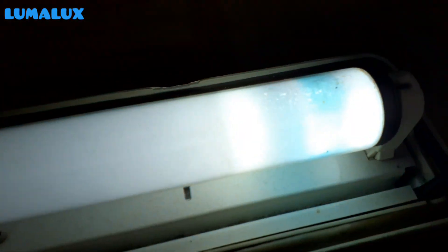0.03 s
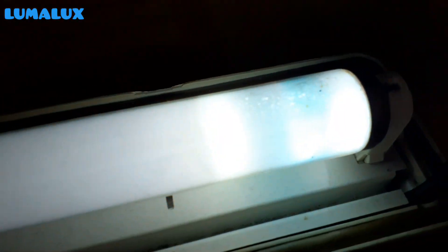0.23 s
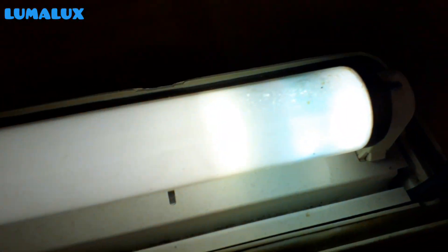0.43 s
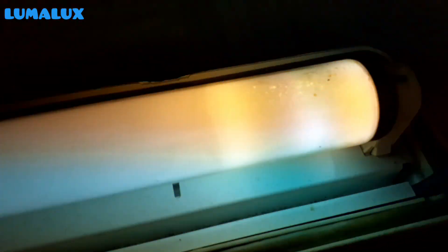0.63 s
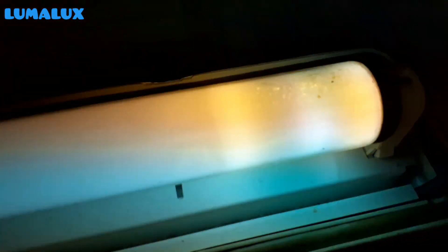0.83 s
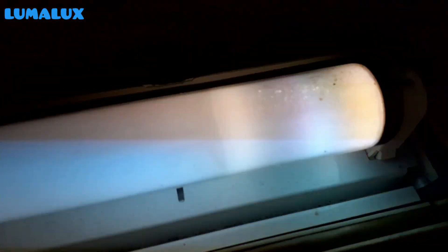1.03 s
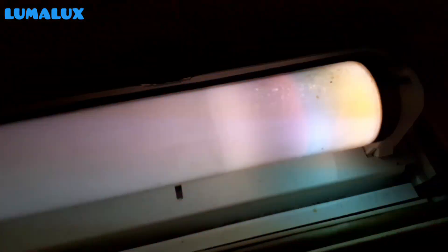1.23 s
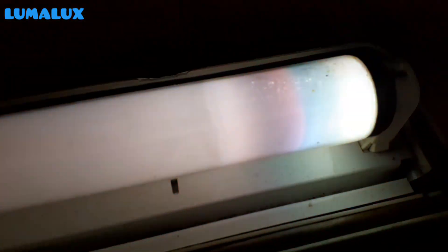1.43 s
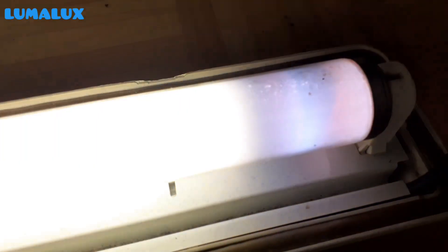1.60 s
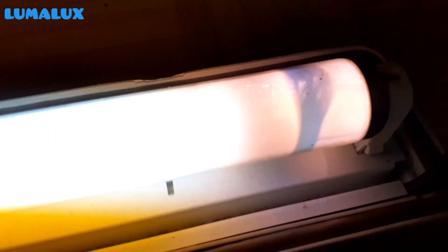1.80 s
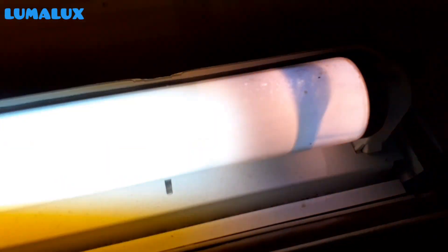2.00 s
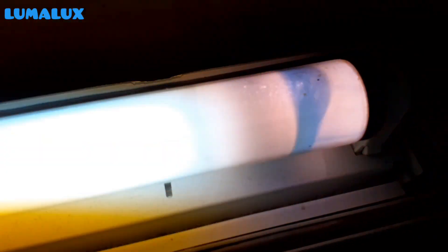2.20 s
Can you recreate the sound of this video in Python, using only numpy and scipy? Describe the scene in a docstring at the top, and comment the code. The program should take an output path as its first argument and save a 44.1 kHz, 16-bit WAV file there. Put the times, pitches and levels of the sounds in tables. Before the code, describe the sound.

A failing fluorescent tube hums and buzzes close by in a small room. Its metal fitting clunks and the starter rattles with rapid glassy ticks. The rattle stops abruptly, leaving a faint buzz, soft hiss and a few tiny ticks.

```python
"""A failing fluorescent tube tries to start, close up in a small room. Its ballast hums and the housing
buzzes on the mains. A surge of current clunks the metal fitting; for half a second the starter
rattles, a glassy tick on about every mains cycle. Then the tube catches: the rattle stops, the hum
drops to a faint buzz over room hiss, and a few faint ticks follow."""
import sys
import numpy as np
from scipy import signal
from scipy.fft import rfft, irfft
from scipy.io import wavfile
from scipy.ndimage import uniform_filter1d

SR = 44100
rng = np.random.default_rng(int(sys.argv[2]) if len(sys.argv) > 2 else 0)


def materialize(psi):
    """Save the field psi as 16-bit PCM at rate SR to the path in sys.argv[1].

    A 1-D psi becomes a single channel; in a 2-D psi each row is a channel.
    """
    bounded = np.clip(np.atleast_2d(psi).T, -1, 1)
    quanta = np.round(bounded * 32767).astype(np.int16)
    wavfile.write(sys.argv[1], SR, quanta)


N = 103635

MAINS_HZ = 50.05
TICK_ALIKE = 0.69  # share of a tick's power that repeats from tick to tick
# The starter's ticks. Each row: start in seconds, glassy ring in relative dB, crack in relative dB.
TICKS = [(1.0107, -42.5, -47.5), (1.0501, -34.5, -47), (1.0697, -37.5, -49), (1.0888, -34.5, -47),
         (1.1072, -39.5, -51.5), (1.1293, -43, -49.5), (1.149, -43.5, -47.5), (1.1688, -51, -53),
         (1.1886, -40.5, -53), (1.2061, -45, -55), (1.2272, -40.5, -54.5), (1.2466, -38, -55.5),
         (1.2674, -43.5, -56.5), (1.2869, -38, -56.5), (1.3076, -40, -56.5), (1.3268, -35.5, -59),
         (1.3365, -38, -56.5), (1.3475, -35.5, -56), (1.366, -39.5, -57.5), (1.3751, -36, -57),
         (1.3879, -37.5, -53.5), (1.408, -36, -61.5), (1.4266, -40, -56), (1.4477, -35.5, -55),
         (1.4668, -44, -59.5), (1.4776, -43, -61.5), (1.4883, -41, -62.5), (1.496, -40, -62),
         (1.5061, -39, -57.5), (1.762, -64.5, -86), (1.802, -62, -80), (1.822, -64, -75.5),
         (2.26, -73, -92), (2.301, -72, -93), (2.34, -71, -87)]


def undb(db):
    """Decibels to gain."""
    return 10 ** (np.asarray(db) / 20)


def unit(x):
    """Scale to rms 1."""
    return x / np.sqrt(np.mean(x ** 2))


def pan(db):
    """Stereo gains with mean 1, the left louder by db."""
    gains = undb(np.array([[db], [-db]]) / 2)
    return gains / gains.mean()


def curve(t, points):
    """Straight lines through (seconds, value) points."""
    return np.interp(t, *np.array(points).T)


def walk(rate):
    """Random drift at rms 1, with rate turns a second."""
    step = int(SR / rate)
    held = np.repeat(rng.standard_normal(N // step + 2), step)
    return unit(uniform_filter1d(held, step)[:N])


def fade(t, t60):
    """Exponential decay, 60 dB down after t60 seconds."""
    return np.exp(-np.log(1000) * t / t60)


def colour(points):
    """An EQ curve through (Hz, dB) points."""
    hz, db = np.array(points).T
    return lambda f: undb(np.interp(np.log(f), np.log(hz), db))


def resonances(rows):
    """An EQ curve of resonant peaks. Each row: centre in Hz, width in Hz, level in dB."""
    return lambda f: np.sqrt(sum(undb(db) ** 2 / (1 + ((f / hz - hz / f) * hz / width) ** 2 / 2) ** 2
                                 for hz, width, db in rows))


def noise(shape):
    """Stereo noise through an EQ curve at rms 1, wider in the treble than in the bass."""
    bass_alike, treble_alike, crossover_hz = 0.3, 0.083, 694
    f = np.fft.rfftfreq(N, 1 / SR) + 1
    alike = treble_alike + (bass_alike - treble_alike) / (1 + (f / crossover_hz) ** 4)
    mid, side = rfft(rng.standard_normal((2, N))) * shape(f)
    return unit(irfft(mid * np.sqrt(1 + alike) + np.array([[1], [-1]]) * side * np.sqrt(1 - alike), N))


def strikes(rows, shape, t60, alike):
    """Each (seconds, dB) blow rings a dense body, partly the same way each time; the room adds a tail."""
    attack_s = 0.00046
    t = np.arange(N // 8) / SR
    room_tail = undb(-18) * fade(t, t60=.16)
    envelope = (1 - np.exp(-t / attack_s)) * np.hypot(fade(t, t60), room_tail)
    body, fresh = noise(shape), noise(shape)
    out = np.zeros((2, N + len(t)))
    for (start_s, db), pick in zip(rows, rng.integers(0, N - len(t), len(rows))):
        i = int(start_s * SR)
        grain = np.sqrt(alike) * body[:, :len(t)] + np.sqrt(1 - alike) * fresh[:, pick:pick + len(t)]
        out[:, i:i + len(t)] += undb(db) * envelope * grain
    return out[:, :N]


def ringing(rows, modes, t60):
    """Blows (seconds, dB) ring a set of resonances, in a slightly different mix each time."""
    vary_db = 2.2
    weights = np.array([undb(db) * np.sqrt(width) for _, width, db in modes])
    out = np.zeros((2, N))
    for weight, mode in zip(weights / np.linalg.norm(weights), modes):
        varied = np.column_stack([rows[:, 0], rows[:, 1] + vary_db * rng.standard_normal(len(rows))])
        out += weight * strikes(varied, resonances([mode]), t60, TICK_ALIKE)
    return out


def room_tone():
    """A steady bed of room tone and hiss."""
    # The bed's colour. Each row: frequency in Hz, relative level in dB.
    air_eq = [(25, -29), (70, -16.5), (150, -10), (300, -9), (450, -11), (700, -14), (1000, -12.5),
              (1400, -23), (1900, -19.5), (2600, -29.5), (4000, -26), (5500, -33.5), (7500, -37.5),
              (9200, -42), (10500, -30), (12000, -25), (15800, -19)]
    return undb(-65) * noise(colour(air_eq)) * pan(2)


def iron_core(t, harmonics, waver_db, boost_db=lambda k: 0):
    """One magnetic pull a cycle bends the core; low overtones lag, reflections scatter the high ones."""
    pull_s, lead_s_per_octave, scatter_hz = .0035, .00565, 520
    hum = np.zeros(N)
    for k, db in harmonics:
        gain = undb(db + boost_db(k) + waver_db * walk(12))
        lead_s = lead_s_per_octave * np.log2(k)
        scatter = (k * MAINS_HZ / scatter_hz) ** 2 * rng.uniform(-1.1, 1)
        hum -= gain * np.cos(2 * np.pi * k * MAINS_HZ * (t - pull_s + lead_s) + scatter)
    return unit(hum)


def mains_pulse(t):
    """A shallow tremolo that peaks once a mains cycle."""
    depth, peak_s = 0.13, 0.01
    return 1 + depth * np.cos(2 * np.pi * MAINS_HZ * (t - peak_s))


def lit_tube(t):
    """The lit tube hums faintly and stirs the panels of its fitting."""
    # The faint hum. Each row: multiple of the mains, relative level in dB.
    harmonics = [(2, -16), (3, 2.5), (4, 3), (5, -19), (6, -6.5), (7, -8.5), (8, -4.5), (9, -10), (10, -25),
                 (11, -5)]
    panels = resonances([(550, 33, -3.5), (846, 41, 3), (1016, 38, 2.5),
                         (1375, 76, -8.5), (1720, 170, -15), (3850, 280, -19)])
    hum = undb(-71) * iron_core(t, harmonics, waver_db=1)
    panel_buzz = undb(-74.5) * mains_pulse(t) * noise(panels)
    return (hum + panel_buzz) * pan(3)


def electrode_fizz(t):
    """The electrode fizzes in a narrow treble band on one half of each mains cycle."""
    peak_s = 0.013
    half_cycle = np.maximum(np.cos(2 * np.pi * MAINS_HZ * (t - peak_s)), 0)
    return undb(-73.5) * half_cycle * noise(resonances([(11410, 250, 0)])) * pan(2)


def housing_buzz(t):
    """The housing buzzes once a mains cycle."""
    # The buzz's colour. Each row: frequency in Hz, relative level in dB.
    buzz_eq = [(80, -14), (160, -6.5), (550, -7), (900, -7), (1300, -14), (2500, -28), (5500, -24.5),
               (8500, -38), (10500, -27), (11400, -23.5), (12300, -21.5), (15500, -26)]
    return undb(-64) * mains_pulse(t) * noise(colour(buzz_eq)) * pan(2)


def starting_hum(t):
    """The core hums while the tube tries to start; one overtone swells before the clunk."""
    # The loud hum. Each row: multiple of the mains, relative level in dB.
    harmonics = [(1, -21), (2, -12), (3, 0.5), (4, -0.5), (5, -7.5), (6, 2), (7, 1.5), (8, -7.5), (9, 2.5),
                 (10, -18), (11, -4), (12, -1), (13, -19), (14, -12), (15, -13), (16, -11), (17, -24.5),
                 (18, -13.5), (19, -18.5), (20, -13.5), (21, -26.5)]
    upper_hz, swelling_harmonic = 680, 12
    # Rides on the upper overtones and the swelling one. Each row: time in seconds, boost in dB.
    upper_db = curve(t, [(0, -1), (.3, -1.5), (.65, 0.5), (1.0, 2), (1.1, 6), (1.25, -14), (1.5, -1)])
    swell_db = curve(t, [(0, -4), (.5, -2.5), (.95, 3), (1.25, -6.5), (1.45, -0.5)])
    boost_db = lambda k: (k * MAINS_HZ > upper_hz) * upper_db + (k == swelling_harmonic) * swell_db
    return iron_core(t, harmonics, waver_db=-0.03, boost_db=boost_db) * pan(6)


def ballast(t):
    """Loud hum, buzz and fizz until the tube catches, then a quick crossfade to the lit tube."""
    catch_s, release_s = 1.507, 0.02
    # The starting hum's fader ride. Each row: time in seconds, level in dB.
    hum_ride = [(0, -54), (.4, -52), (1.0, -51.5), (1.15, -52), (1.35, -52), (1.5, -54.5)]
    level = undb(curve(t, hum_ride))
    follow_hum = level / level.max()
    hum = level * starting_hum(t)
    buzz = follow_hum * housing_buzz(t)
    lit = lit_tube(t)
    fizz = follow_hum * electrode_fizz(t)
    starting = np.exp(-np.maximum(t - catch_s, 0) / release_s)
    return starting * (hum + buzz + fizz) + (1 - starting) * lit


def clunk(t):
    """The first surge of current knocks the metal fitting; the ticks keep shaking it."""
    # The fitting's modes. Each row: frequency in Hz, relative level in dB, 60 dB decay time in seconds.
    fitting_modes = [(311, -8, 0.22), (340, -15, 0.23), (455, -7.5, 0.14), (570, 5.5, 0.099),
                     (651, -8.5, 0.14), (714, -10, 0.14), (907, -4.5, 0.16), (995, -13.5, 0.16),
                     (1168, -19.5, 0.25), (1300, -20, 0.09), (1395, -16, 0.27), (1770, -23, 0.1),
                     (2170, -24.5, 0.14)]
    # The thud's colour. Each row: frequency in Hz, relative level in dB.
    thud_eq = [(150, -34), (400, -1), (600, 3.5), (950, -2), (1400, -7), (1900, -47), (4000, -53)]
    clunk_s, shake_db = 1.012, -7
    blows = np.zeros(N)
    for (start_s, _, crack_db), sign in zip(TICKS, rng.choice([-1, 1], len(TICKS))):
        blows[int(start_s * SR)] = sign * undb(crack_db + shake_db)
    blows[int(clunk_s * SR)] = undb(-41.5)
    metal_ring = sum((-1) ** k * undb(db) * fade(t, t60) * np.sin(2 * np.pi * hz * t)
                     for k, (hz, db, t60) in enumerate(fitting_modes))
    thud = strikes([(clunk_s, -35.5)], colour(thud_eq), t60=0.083, alike=0)
    return (signal.fftconvolve(blows, metal_ring)[:N] + thud) * pan(1)


def starter():
    """Every tick is a broad crack, a lower and a higher glassy ring, roughened by contact chatter."""
    # Resonances rung by each tick: one low ring of the metal fitting, then high glassy rings.
    # Each row: centre in Hz, width in Hz, relative level in dB.
    tick_modes = [(1766, 61, -12), (10110, 370, -15.5), (10510, 310, -9.5), (11480, 98, 1),
                  (12400, 1100, -9.5), (13400, 830, -11), (14270, 330, 3), (15180, 290, 4.5),
                  (15650, 370, 4)]
    # Lower resonances of the glass, rung along with the crack. Each row: centre in Hz, width in Hz, relative
    # level in dB.
    low_glass_modes = [(4170, 52, -9), (4830, 32, -5), (5420, 260, 4), (5900, 190, 3), (6790, 84, 5),
                       (7550, 150, 5), (8220, 93, 5)]
    # The crack's colour. Each row: frequency in Hz, relative level in dB.
    crack_eq = [(300, 2.5), (1000, -1), (1800, -5.5), (2600, -9.5), (4000, -5), (5600, -0.5), (6600, -1),
                (7100, -7.5), (7800, -7), (8700, -2), (10000, -0.5), (15000, 1)]
    chatter_db, chatter_per_s, right_lag_s = 2, 700, .0004
    ticks = np.array(TICKS)
    ring_blows, crack_blows = ticks[:, [0, 1]], ticks[:, [0, 2]]
    ring = undb(6) * ringing(ring_blows, tick_modes, t60=.038)
    crack = undb(4.5) * strikes(crack_blows, colour(crack_eq), t60=0.14, alike=TICK_ALIKE)
    low_glass = undb(-0.5) * ringing(crack_blows, low_glass_modes, t60=0.055)
    chatter = lambda: undb(chatter_db * walk(chatter_per_s))
    left, right = ring * chatter() * pan(6.5) + (crack + low_glass) * chatter() * pan(5.5)
    return np.array([left, np.roll(right, int(right_lag_s * SR))])  # ticks reach the right side later


def scene():
    """The struggling tube, left of centre, over room tone."""
    t = np.arange(N) / SR
    return room_tone() + ballast(t) + starter() + clunk(t)


def record(dry):
    """A steep low-pass cuts the very top."""
    top_hz = 15800
    return signal.sosfilt(signal.ellip(10, .2, 70, top_hz, fs=SR, output="sos"), dry)


dry = scene()
out = record(dry)
materialize(out)
```